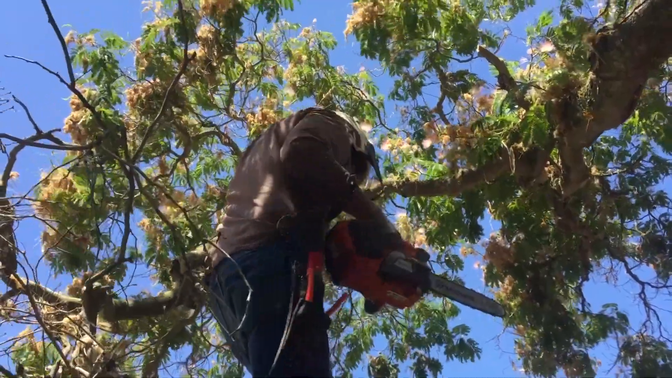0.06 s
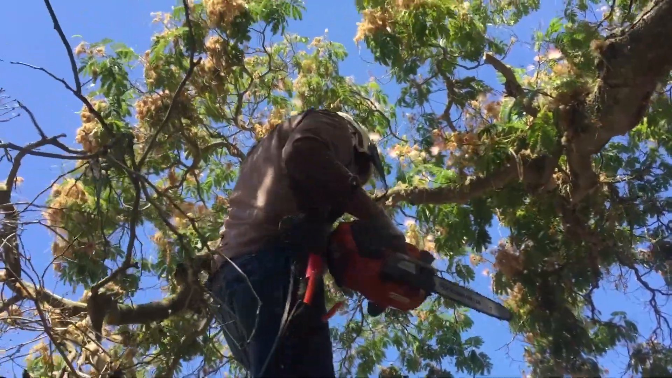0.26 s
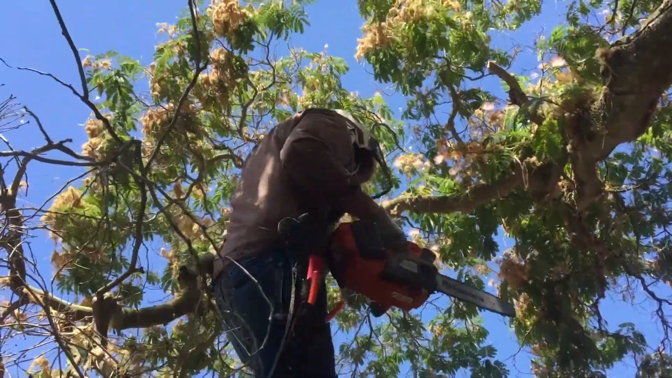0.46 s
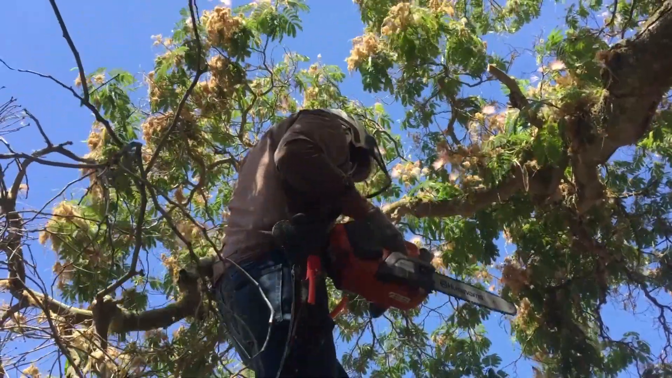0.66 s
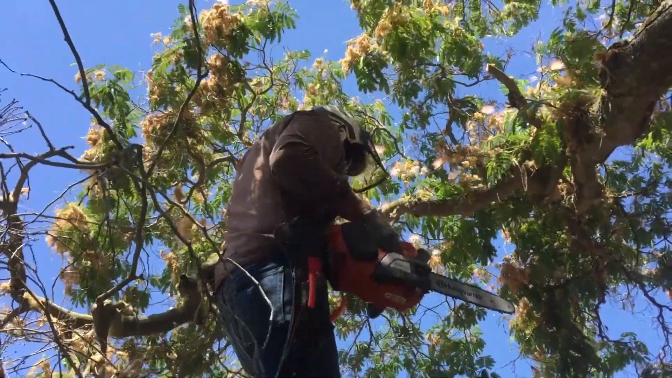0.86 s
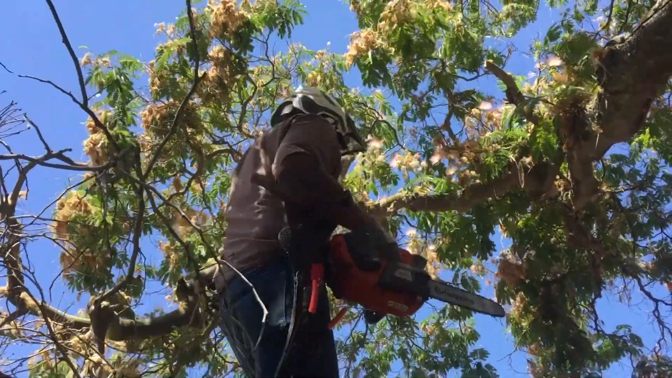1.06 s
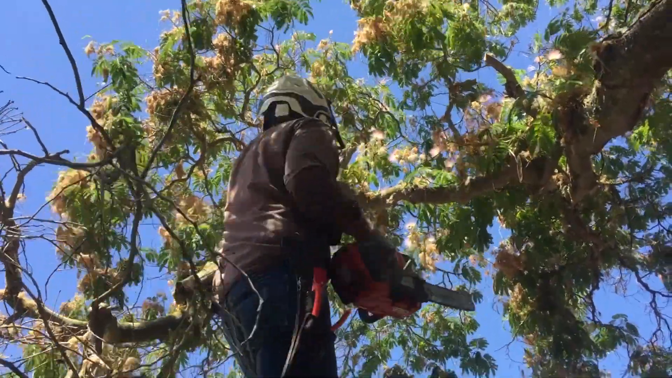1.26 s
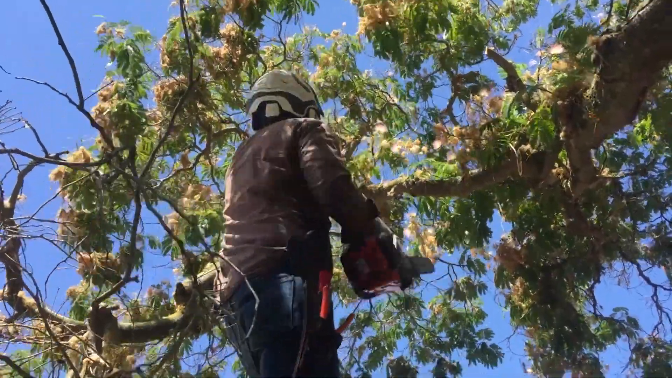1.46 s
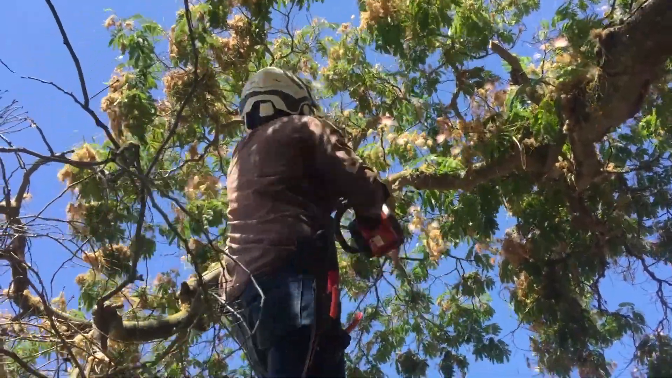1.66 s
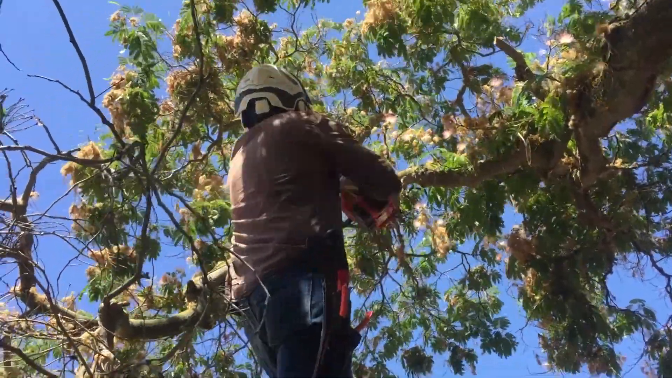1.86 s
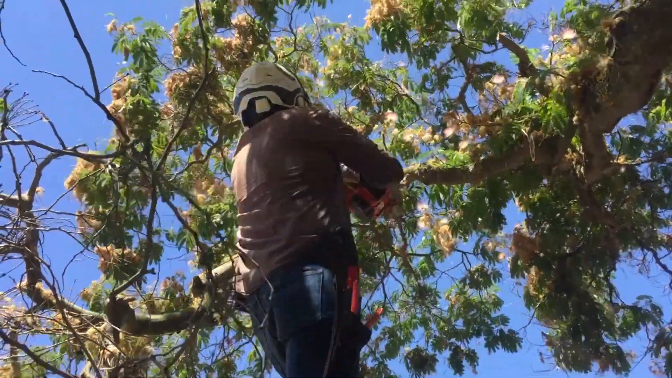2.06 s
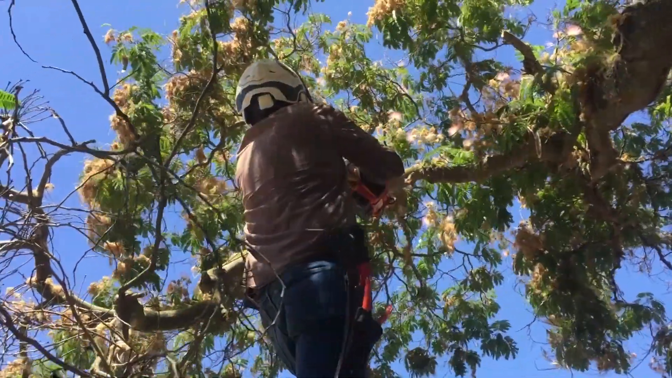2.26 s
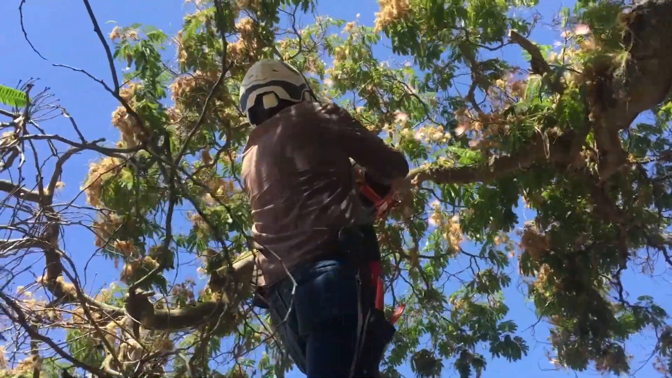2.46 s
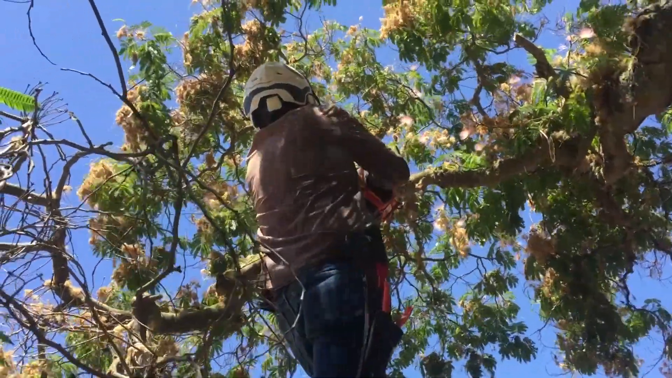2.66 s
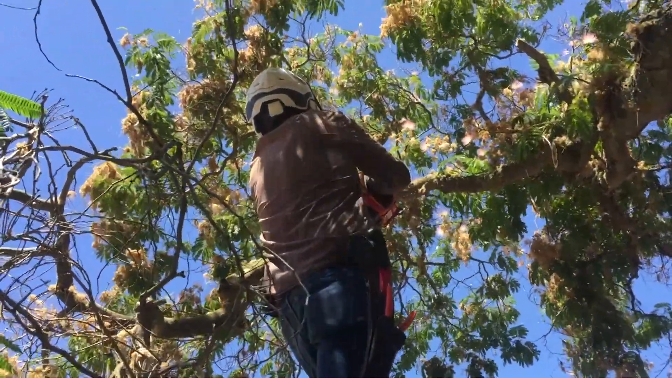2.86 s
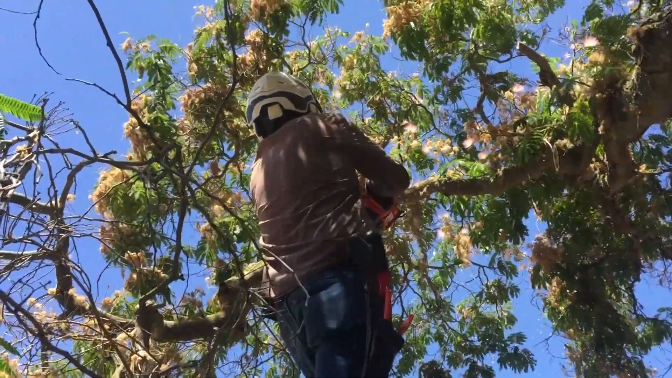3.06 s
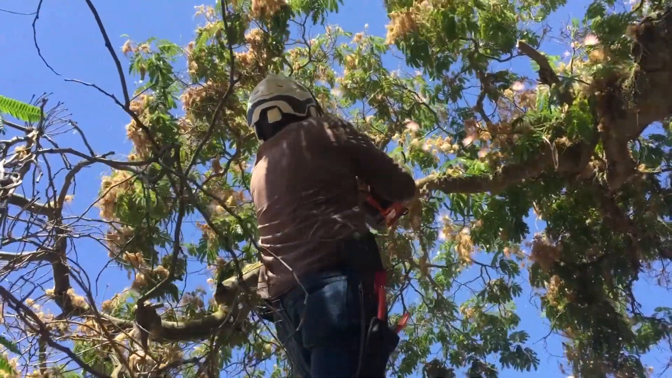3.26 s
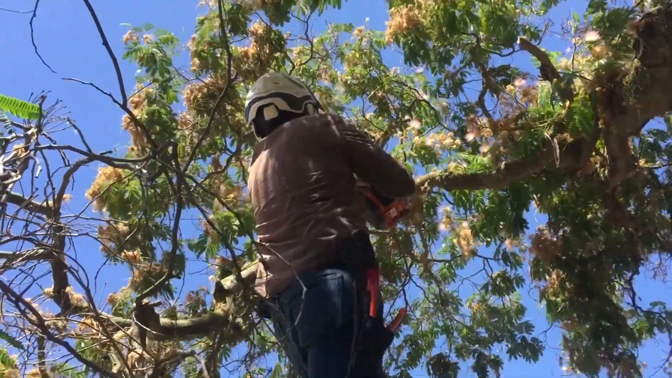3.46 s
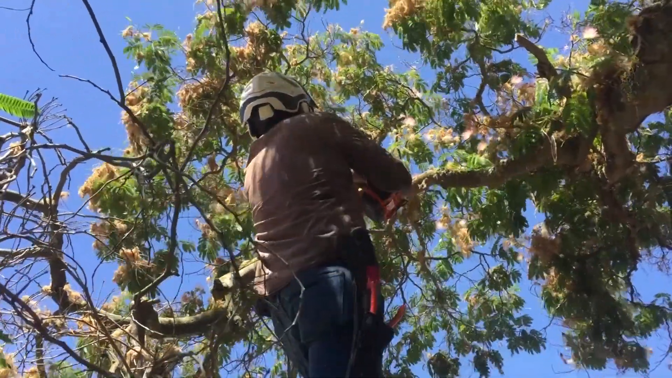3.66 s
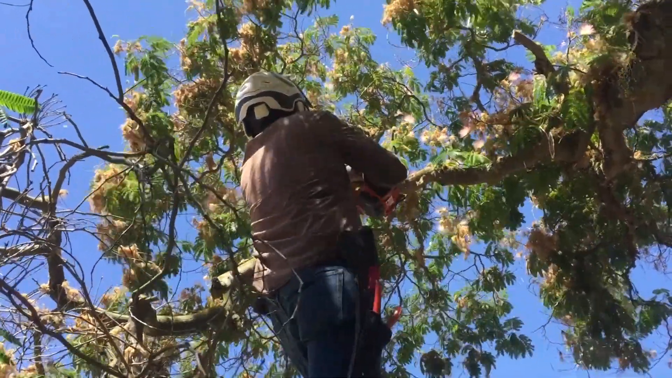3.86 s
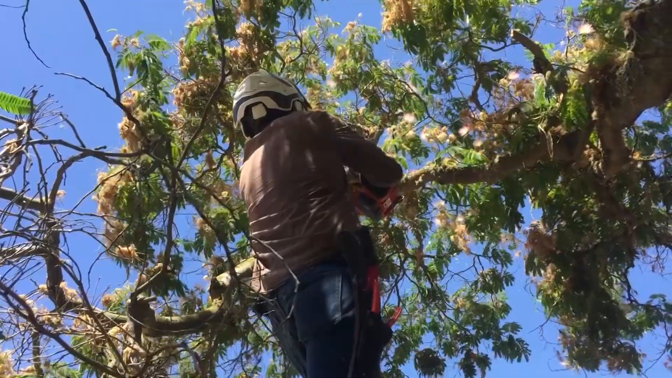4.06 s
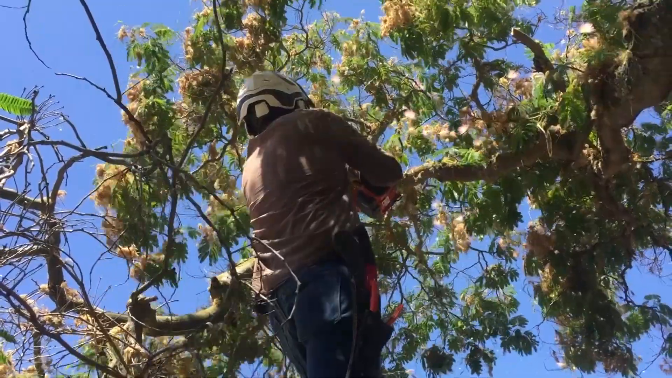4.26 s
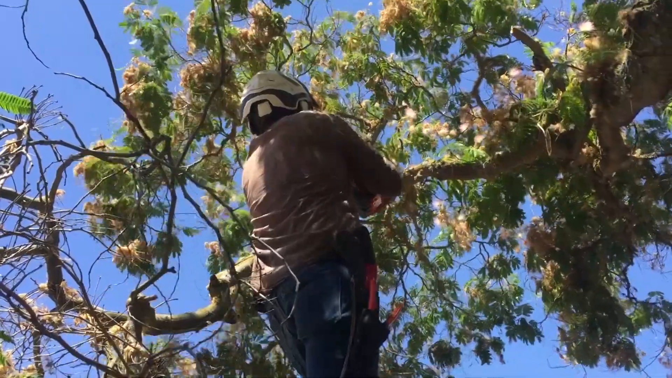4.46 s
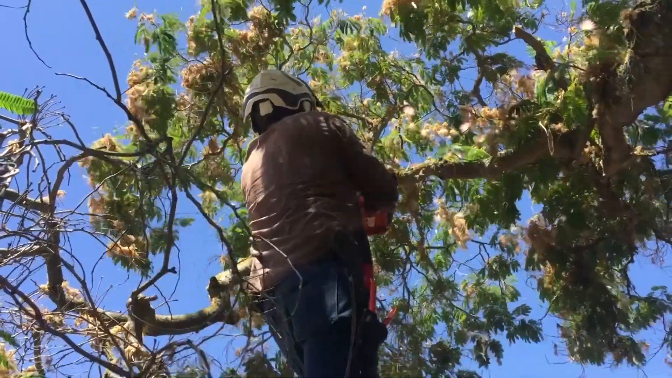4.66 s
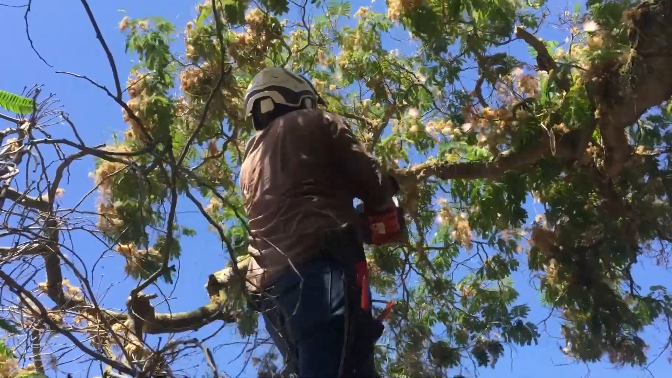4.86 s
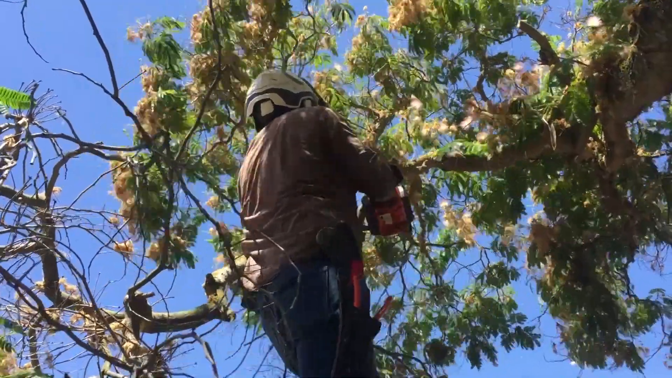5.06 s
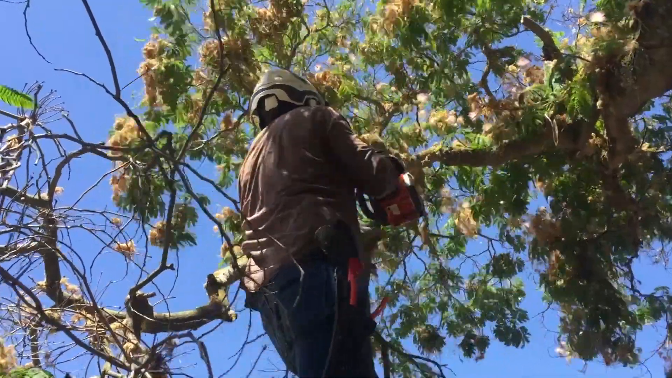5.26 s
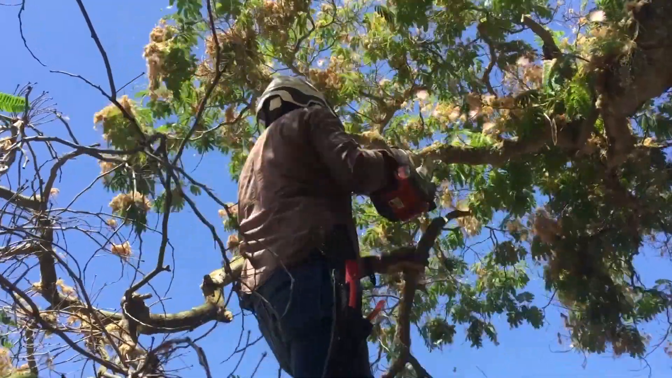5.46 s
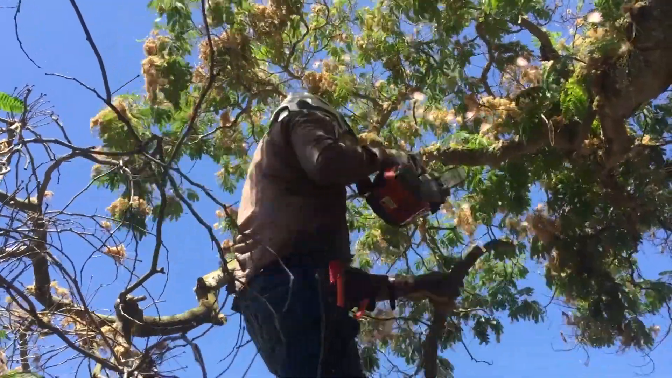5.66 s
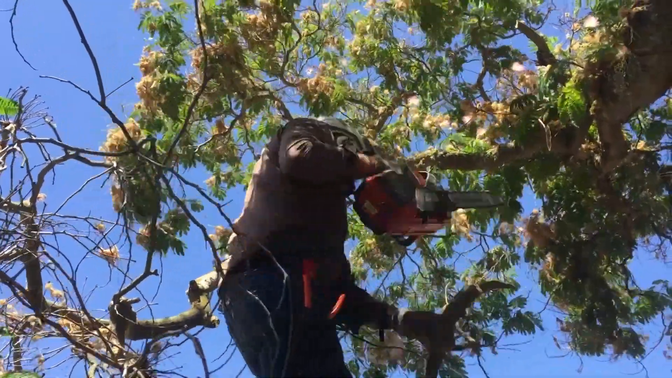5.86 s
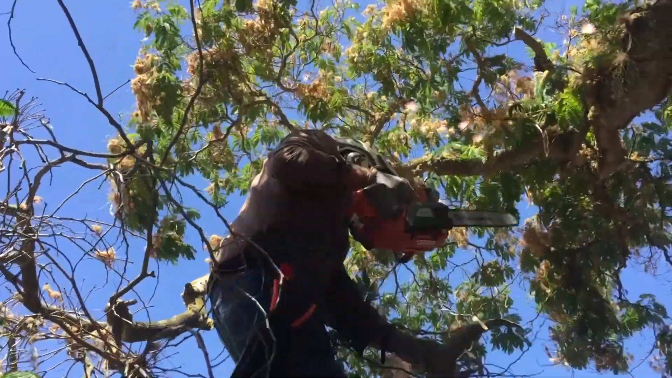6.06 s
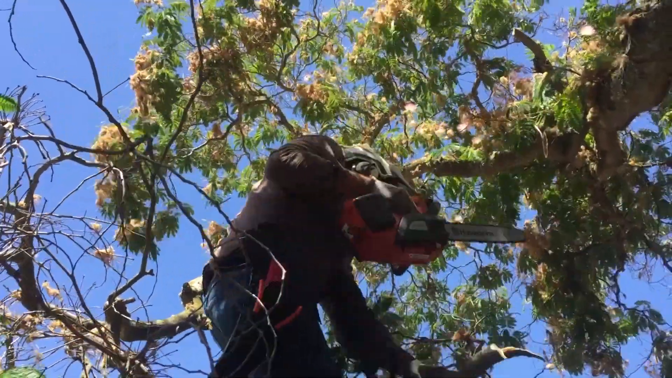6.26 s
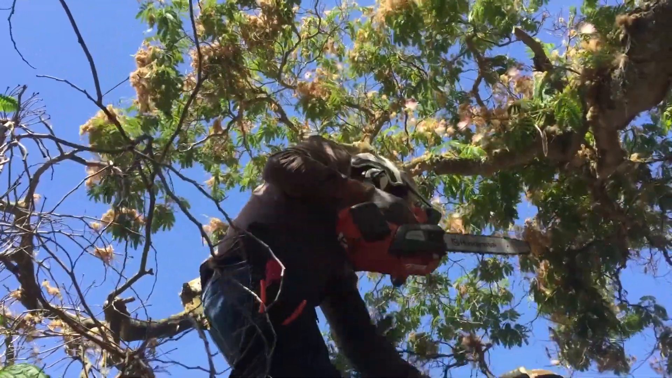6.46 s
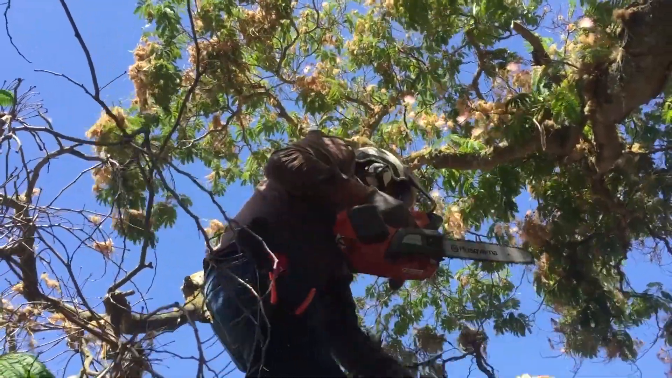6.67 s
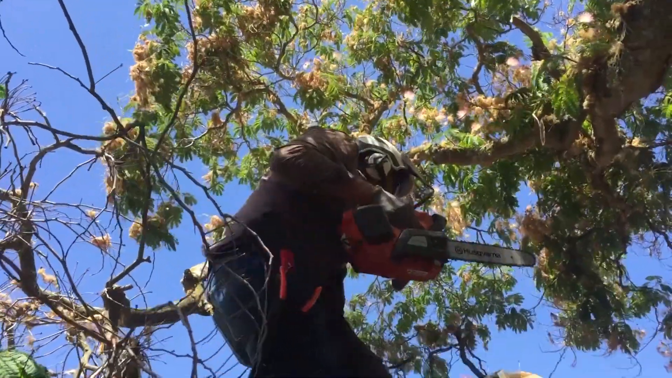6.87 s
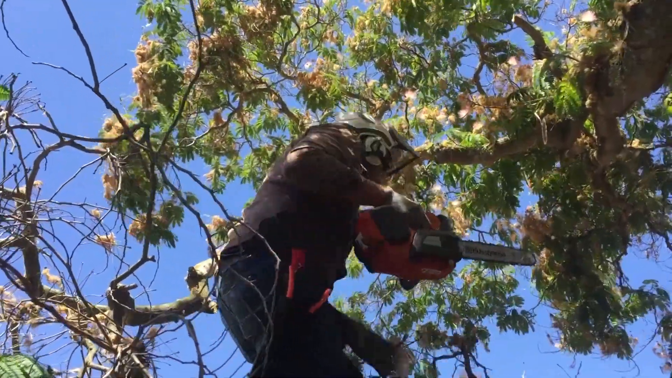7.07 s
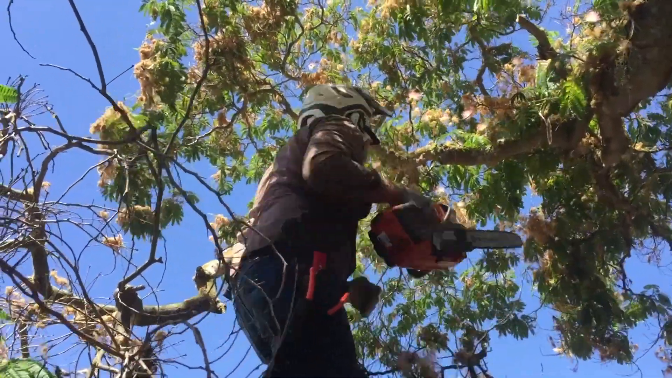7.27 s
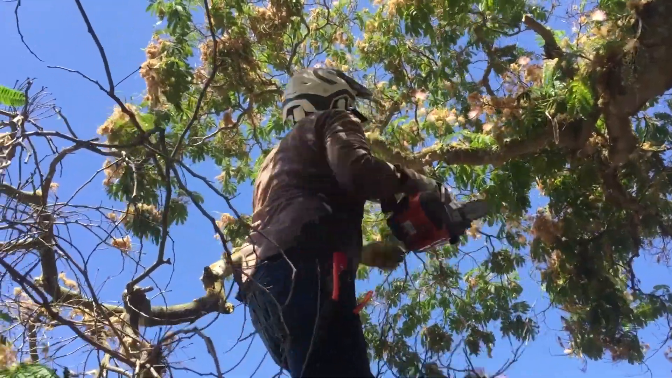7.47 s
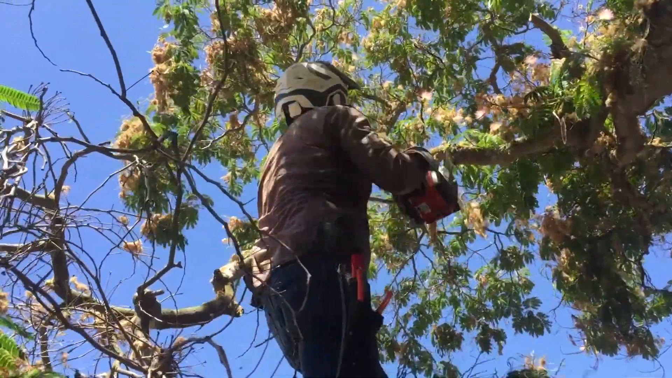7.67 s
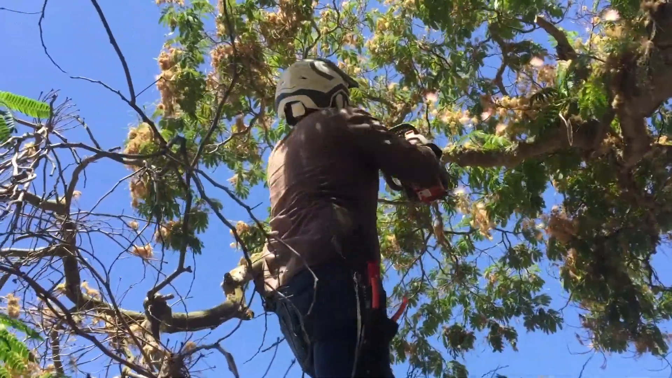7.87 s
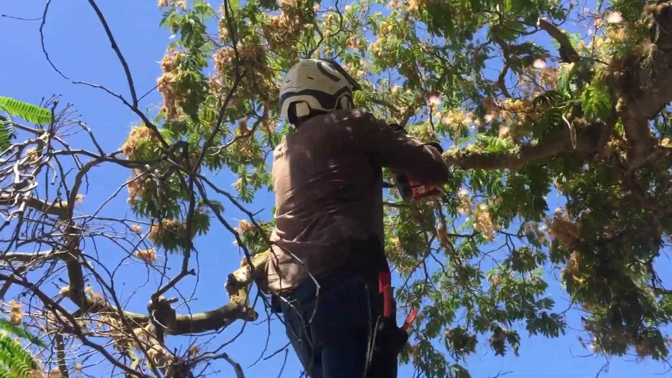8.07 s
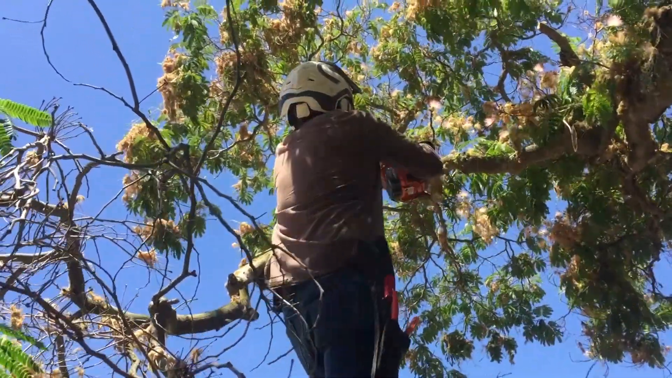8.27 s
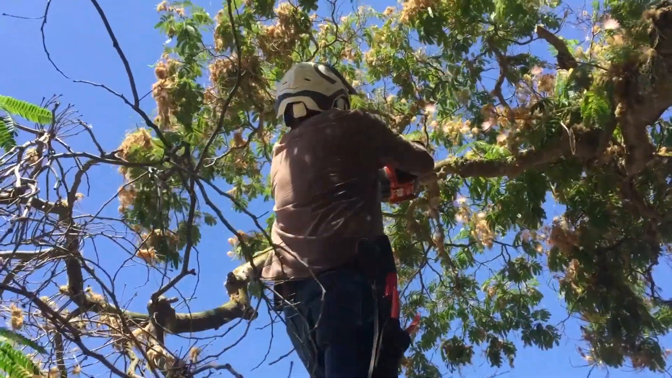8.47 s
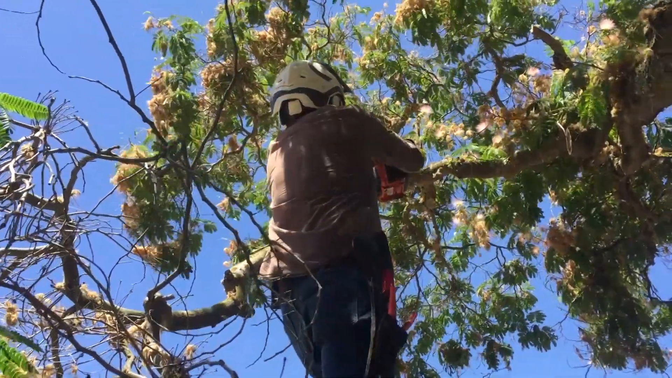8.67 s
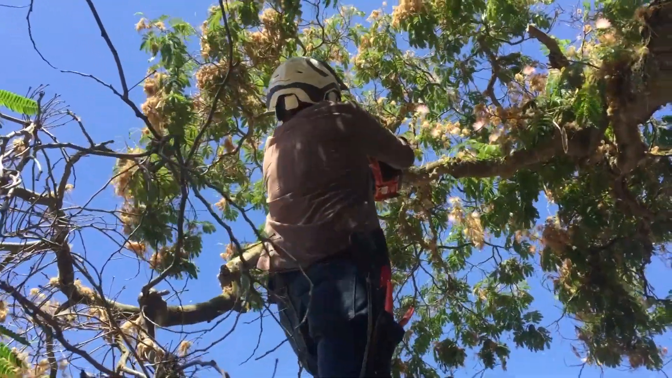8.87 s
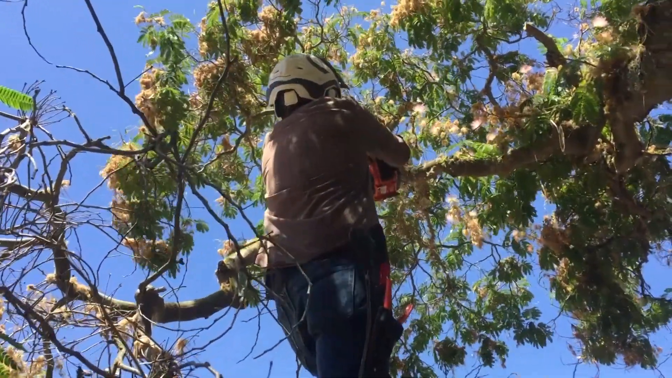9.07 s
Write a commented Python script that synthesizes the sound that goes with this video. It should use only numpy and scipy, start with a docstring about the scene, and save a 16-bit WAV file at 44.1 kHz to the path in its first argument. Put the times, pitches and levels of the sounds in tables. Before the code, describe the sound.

Heard from the ground outdoors, a climber prunes a tree with a small battery chainsaw. A sharp snap and faint falling bird whistles come first, then two quick bursts of rising electric whine and chain chatter. A limb knocks, leaves rustle, and a run of twig snaps and gear clicks follows. The saw starts again at the end. A far engine hums softly throughout.

```python
"""Under a tree: a climber prunes it with a small battery chainsaw, heard from the ground.
The motor spins up in three bursts: links slap the sprocket (harmonic whine) and chatter in the bar (shaped
grains and noise). Decaying noise makes snaps, knocks and jolts; flicked resonators make twigs and leaves.
A metal part squeaks and a small bird whistles falling notes (sines); a far engine hums and rumbles in open air."""
import sys
import numpy as np
from scipy import signal
from scipy.fft import rfft, irfft, next_fast_len
from scipy.io import wavfile
from scipy.ndimage import uniform_filter1d

SR = 44100
rng = np.random.default_rng(int(sys.argv[2]) if len(sys.argv) > 2 else 0)


def unload_wav(signal):
    """Save mono or channel-first audio to the path in sys.argv[1] as 16-bit WAV at rate SR, clipped to [-1, 1]."""
    wavfile.write(
        sys.argv[1],
        SR,
        np.round(np.clip(np.atleast_2d(signal).T, -1, 1) * 32767).astype(np.int16),
    )


N = 402191
TIME = np.arange(N) / SR
LINKS_PER_TURN, TOP_SPEED_TURNS_PER_S = 6, 170
# resonances of bar and housing: centre_hz, width_hz, boost_db
BAR_RESONANCES = [(845, 115, 9), (1181, 120, 6.5), (1460, 51, 9), (1837, 11, 14.5), (2714, 35, 4.5),
                  (5220, 58, 7), (5860, 75, 2.5), (6230, 53, 5)]
# trigger pulls: start_s, shade_db (how the saw is held, acts on whine harmonics 3 and up)
TRIGGER_PULLS = [(2.465, 0.5), (3.714, 0.5), (8.622, -0.5)]


def chainsaw():
    """Links meet the sprocket six times a turn and clatter in the bar's groove, louder with speed and tension."""
    # chain tension, slack when coasting, tight in the cut: time_s, tension_db
    tension = [(2.6, 2), (2.8, 0.5), (2.95, -1.5), (3.25, -1.9), (3.34, -0.7), (3.45, -1.5), (3.85, -0.5),
               (3.98, 1.3), (4.1, 0.9), (4.24, 0.2), (4.38, -1), (4.54, 3), (8.78, 3), (8.9, 0.4),
               (9.12, -1.8)]
    # rattle spectrum: freq_hz, relative_db
    rattle_colour = [(150, -57.5), (330, -8.5), (520, -5.5), (700, 0.5), (1100, -2.5), (2200, 1.5),
                     (4600, -3.5), (6000, -37.5), (9000, -39)]
    # hiss spectrum: freq_hz, relative_db
    hiss_colour = [(3000, -8), (4800, -6.5), (6000, -5), (7200, -9), (8600, -4.5), (9700, -7), (10500, -12),
                   (12200, -5.5), (16000, -16)]
    # at top speed and 0 dB tension
    rattle_db, hiss_db, ripple_db = -28.5, -24.5, -46.5
    # exponents of speed; shares of tension
    rattle_power, hiss_power, rattle_taut, hiss_taut = 0.92, 1.49, 0.81, 1

    speed = motor_speed()
    (tension_db,) = in_time(tension)
    pace = speed / TOP_SPEED_TURNS_PER_S
    slack = np.clip(1 - speed / 120, 0, 1)   # a slow chain hangs loose and runs unevenly
    unevenness = (0.00092 + 0.05 * slack) * drift(40.6)
    turns = np.cumsum(speed * (1 + unevenness)) / SR
    link_phase = 2 * np.pi * LINKS_PER_TURN * turns

    # impacts bunch once a link and swell once a turn
    per_link = 1 + 0.16 * np.cos(link_phase)
    per_turn = 1 + 0.027 * np.cos(2 * np.pi * turns)
    beat = per_link * per_turn * from_db(0.59 * drift(35))
    rattle_level = from_db(rattle_db + rattle_taut * tension_db) * pace ** rattle_power
    hiss_level = from_db(hiss_db + hiss_taut * tension_db) * pace ** hiss_power
    rattle = rattle_level * coloured(beat * grains(14000, spread_db=2.0), rattle_colour, BAR_RESONANCES)
    hiss = hiss_level * coloured(beat * rng.standard_normal(N), hiss_colour, BAR_RESONANCES)
    motor = from_db(ripple_db) * pace ** 2 * ripple(turns)
    return whine(link_phase, speed, tension_db) + motor + rattle + hiss


def motor_speed():
    """At each pull the motor climbs its soft start until it meets the speed it is allowed."""
    # soft start, alike at every pull: after_pull_s, speed_turns_per_s
    spin_up = [(0, 0.5), (.065, 29.5), (.135, 52), (.235, 79), (.335, 122.5), (.43, 172)]
    # speed that trigger and wood allow, one list per pull: time_s, speed_turns_per_s
    held_speed = [
        [(2.89, 170), (3.13, 170.5), (3.31, 162.5), (3.35, 150.5), (3.43, 123.5), (3.55, 89), (3.7, 60.5),
         (4.0, 0)],
        [(4.125, 161.5), (4.3, 151.5), (4.35, 144.5), (4.45, 124.5), (4.5, 124), (4.55, 109), (4.645, 0)],
        [(9.04, 163.6), (9.12, 170)],
    ]
    after_s, climb = np.transpose(spin_up)
    runs = []
    for (start_s, _), held in zip(TRIGGER_PULLS, held_speed):
        soft_start = np.interp(TIME - start_s, after_s, climb, left=0)
        runs.append(np.minimum(soft_start, in_time(held)[0]))
    return np.maximum(np.max(runs, axis=0), 0)


def whine(link_phase, speed, tension_db, flicker_db=2.5):
    """Link-rate harmonics flare as they sweep through the saw's resonances; a taut chain sings brighter."""
    # harmonics from the link rate up: level_db (top speed, before colour), gain_per_tension_db
    link_harmonics = [(-29.5, -0.8), (-34.5, 2.5), (-39.5, 0.3), (-37.5, 1.5), (-42.5, 2.5), (-42, 1.6)]
    # how the saw radiates the whine: freq_hz, gain_db
    whine_colour = [(200, -29), (470, -6), (555, -7.5), (610, 3.5), (705, 0.5), (765, -7), (850, -3.5),
                    (930, -0.5), (1030, -8), (1250, -8), (1500, -2), (1660, -6), (1800, 0), (2050, 2),
                    (2300, 1), (3000, 0.5), (3880, 0), (4070, -5), (4500, 3), (5400, -17), (6100, 6.5)]
    hz = np.arange(1, SR / 2)
    radiated_db = shape_db(hz, whine_colour, BAR_RESONANCES)
    pulled_s, shade_db = np.transpose(TRIGGER_PULLS)
    shade_db = shade_db[np.searchsorted(pulled_s, TIME) - 1]
    out = 0
    for k, (db, taut) in enumerate(link_harmonics, 1):
        colour_db = np.interp(k * LINKS_PER_TURN * speed, hz, radiated_db)
        level_db = db + taut * tension_db + (k > 2) * shade_db + colour_db
        waver_rad = 0.14 * k * drift(45)
        out = out + from_db(level_db + flicker_db * drift(12)) * np.sin(k * link_phase + waver_rad)
    return np.sqrt(2) * speed / TOP_SPEED_TURNS_PER_S * out


def ripple(turns):
    """Weak motor lines; the chain whips about, so each one wavers."""
    # motor lines: multiple of the turning rate
    motor_orders = [5, 7, 8, 9, 11, 14, 16, 22]
    lines = 0
    for multiple in motor_orders:
        level = from_db(1.8 * drift(2.7))
        phase = 2 * np.pi * (multiple * turns + rng.random()) + 0.19 * drift(13)
        lines = lines + level * np.sin(phase)
    return coloured(lines, [(450, 0), (12000, 0.024)], BAR_RESONANCES)


def jerks():
    """The starting chain or a bump jolts the housing: a short clash and a hollow clunk."""
    # jolts: start_s, relative_db
    jolts = [(2.4631, -39), (2.4702, -25.5), (2.483, -31), (2.501, -37), (6.413, -39.5), (7.222, -39),
             (8.628, -44), (8.635, -32.5), (8.656, -33)]
    # housing modes: centre_hz, width_hz, relative_db
    housing_modes = [(420, 39, 10), (670, 56, 5.5), (792, 320, -3), (2250, 730, -7), (3330, 1700, -14.5)]
    start_s, db = np.transpose(jolts)
    clash = bursts(start_s, db, 0.034) * rng.standard_normal(N)
    return from_db(17.5) * ring(clash, housing_modes) + from_db(-5) * band(clash, 512, 9000)


def snaps():
    """Twigs snap and gear clicks: fibres part in milliseconds, splinters crackle on briefly."""
    # snaps: start_s, crack_relative_db, treble_relative_db, duration (t60_s / 1.87)
    snap_events = [(0.3765, -48, -53, 0.009), (.6536, -54, -48, 0.078), (0.8258, -56, -50.5, 0.018),
                   (0.982, -31.5, -20, 0.0084), (1.0488, -52.5, -51.5, 0.041), (4.738, -58, -52, .015),
                   (4.8437, -69, -47, 0.013), (5.1137, -44.5, -42, 0.017), (5.8431, -48, -45, 0.0067),
                   (6.187, -52, -39.5, 0.013), (6.364, -64.5, -49.5, 0.027), (6.5247, -38, -30.5, 0.014),
                   (6.602, -33, -29.5, 0.0046), (6.6808, -42, -38, 0.0073), (6.736, -42.5, -44, 0.0073),
                   (6.782, -50, -45.5, 0.025), (6.914, -60, -49.5, 0.017), (7.213, -37.5, -29, 0.014),
                   (7.2435, -50, -36.5, 0.006), (7.3539, -50.5, -49.5, 0.029), (7.4801, -51, -40, 0.01),
                   (7.4951, -37.5, -29, 0.016), (7.538, -41, -33, 0.01), (7.669, -31, -27, 0.0086),
                   (7.796, -43, -51, .03), (7.807, -40, -28.5, 0.0069)]
    start_s, crack_db, treble_db, duration = np.transpose(snap_events)
    t60_s = 1.87 * duration
    onset_db = 10 * np.log10(1 + 0.23 / t60_s)   # a shorter snap packs its energy into a higher peak
    crack = splinters(1390, 5000) + from_db(-10) * noise(330, 1300)
    out = 0
    for db, source in [(crack_db, crack), (treble_db, splinters(5160, 16000))]:
        envelope = bursts(start_s, db + onset_db, t60_s) + bursts(start_s, db - 17.0, 0.08)
        out = out + source * uniform_filter1d(envelope, size=24)   # the break opens in about 0.5 ms
    return out


def splinters(low_hz, high_hz, count=5):
    """Noise whose bands swell independently, so that snaps differ in colour."""
    edges_hz = np.geomspace(low_hz, high_hz, count + 1)
    parts = []
    for low, high in zip(edges_hz, edges_hz[1:]):
        parts.append(rms_one(band(rng.standard_normal(N), low, high)))
    parts = np.array(parts)
    swell_db = 2 * np.array([drift(12) for _ in parts])
    gains = from_db(swell_db) * edges_hz[1:, None] ** 0.25
    return rms_one(np.sum(parts * gains, axis=0) / np.linalg.norm(gains, axis=0))


def knocks():
    """Limbs bump: bark crunches into the wood's modes, over a low thump."""
    # knocks: start_s, knock_relative_db, thump_relative_db
    knock_events = [(0.453, -46, -48), (0.984, -36.5, -37.5), (4.812, -62.5, -40.5), (5.029, -39.5, -67),
                    (5.05, -41, -63), (5.4861, -22.5, -61), (5.509, -34, -39), (5.667, -50.5, -60),
                    (6.792, -44, -64), (7.215, -32.5, -59), (7.836, -37.5, -42.5)]
    # limb modes: centre_hz, width_hz, relative_db
    limb_modes = [(207.4, 14, 6.5), (404, 60, -9), (756, 130, -4), (1124, 116, -1), (1800, 240, -3.5),
                  (3420, 900, -8.5), (6450, 1200, -8.5)]
    start_s, db, thump_db = np.transpose(knock_events)
    crunch = bursts(start_s, db, 0.052) * rng.standard_normal(N)
    shudder = bursts(start_s, db - 6.5, 0.2) * band(rng.standard_normal(N), 150, 1500)   # low modes ring on
    thump = bursts(start_s, thump_db + 0.5, 0.28) * noise(38, 210)
    return from_db(17) * ring(crunch + shudder, limb_modes) + thump


def squeak(t60_s=0.4):
    """A metal part of the gear sings faintly in thin, unsteady tones."""
    # tones: freq_hz, relative_db
    squeak_tones = [(2476, -7), (2713, -1.5)]
    start_s, length_s, level_db = 0.41, 0.14, -64
    tones = 0
    for hz, db in squeak_tones:
        tones = tones + from_db(db + 2 * drift(20)) * np.sin(2 * np.pi * hz * TIME)
    return swells([start_s], [length_s], [level_db], t60_s) * tones


def foliage():
    """The climber brushes by: twigs scrape and dry leaves rub, with stray ticks."""
    # brushes: start_s, length_s, twig_db, leaf_db
    brushes = [(0.447, 0.068, -53.5, -56), (0.672, 0.017, -54.5, -51), (4.601, 0.041, -43.5, -45),
               (4.736, 0.48, -57.5, -57), (5.108, 0.029, -56, -39), (5.29, 0.022, -64.5, -49),
               (6.027, 0.05, -63.5, -50), (6.39, 0.054, -62, -52.5), (6.521, 0.17, -66, -51),
               (6.865, .03, -66, -47.5), (7.144, 0.12, -56, -52.5), (7.48, 0.41, -51, -49),
               (7.81, 0.027, -48, -44)]
    # leaves stirring between brushes: time_s, level_db
    stir_level = [(0, -71.5), (1.1, -73), (1.4, -86.5), (4.3, -85), (4.7, -53.5), (5.9, -63.5),
                  (7.9, -54.5), (8.1, -68.5), (8.6, -76)]
    # twig spectrum: freq_hz, relative_db
    twig_colour = [(200, -13.5), (400, 3), (900, 0.5), (1600, -2.5), (2800, -3), (5000, -7.5)]
    # leaf spectrum: freq_hz, relative_db
    leaf_colour = [(1500, -28.5), (3200, -5), (6000, -4), (9000, -2.5), (10500, -6), (12500, -3),
                   (16000, -7)]
    twig_t60_s, leaf_t60_s, stir_twig_db = 0.37, 0.33, -8   # stir_twig_db: twigs against leaves
    start_s, length_s, twig_db, leaf_db = np.transpose(brushes)
    stir = from_db(in_time(stir_level)[0])
    twigs = np.hypot(swells(start_s, length_s, twig_db, twig_t60_s), from_db(stir_twig_db) * stir)
    leaves = np.hypot(swells(start_s, length_s, leaf_db, leaf_t60_s), stir)
    scrape = coloured(crackle(3000, spread_db=3.0), twig_colour)
    rustle = rms_one(crackle(7000, spread_db=2.8))
    ticks = from_db(-5) * grains(70, spread_db=3.5)
    return twigs * scrape + leaves * coloured(rustle + ticks, leaf_colour)


def crackle(per_s, spread_db, clump_db=4, count=30):
    """Each flick of a twig or leaf rings briefly at one of many pitches."""
    flicks = grains(per_s, spread_db) * from_db(clump_db * drift(16))
    dealt = rng.integers(0, count, N)
    pitches_hz = np.geomspace(380, 15500, count)
    widths_hz = 60 + pitches_hz / 22
    return sum(ring(flicks * (dealt == k), [(pitches_hz[k], widths_hz[k], 0)]) for k in range(count))


def bird(high_hz=6800, low_hz=5150, length_s=0.047):
    """A small bird's thin whistles slide down."""
    # notes: start_s, peak_db
    bird_notes = [(.76, -60), (.855, -64), (.94, -62.5), (1.13, -70)]
    out = np.zeros(N)
    along = np.linspace(0, 1, int(length_s * SR))
    pitch_hz = high_hz + (low_hz - high_hz) * along
    note = np.sin(np.pi * along) * np.sin(2 * np.pi * np.cumsum(pitch_hz) / SR)
    for start_s, db in bird_notes:
        at = int(start_s * SR)
        out[at:at + len(note)] += from_db(db) * note
    return out


def surroundings():
    """A far engine hums at firing-rate multiples and throbs as noise, under the hush of open air."""
    # engine lines: multiple of the firing rate, mean_peak_db
    engine_lines = [(2, -57), (3, -60), (4, -62.5)]
    # rumble spectrum: freq_hz, relative_db
    rumble_colour = [(20, -44), (35, -27.5), (50, 1), (90, -2), (150, -4.5), (260, -7), (320, -18),
                     (400, -34.5)]
    # rumble course: time_s, relative_db
    rumble_level = [(0, -60.5), (1.2, -60), (4.4, -55.5), (4.9, -54), (5.3, -57.5), (6.2, -58.5),
                    (7.75, -53), (8.1, -57.5)]
    # open-air spectrum: freq_hz, relative_db
    air_colour = [(100, -5.5), (700, 0.5), (1300, -5), (2500, -11), (5000, -15), (16000, -25.5)]
    firing_hz = 33.9
    firing_phase = 2 * np.pi * np.cumsum(firing_hz * (1 + 0.012 * drift(2.4))) / SR
    hum = 0
    for k, db in engine_lines:
        level = from_db(db + 1.6 * drift(2.1))
        hum = hum + level * np.sin(k * firing_phase + 2 * np.pi * rng.random())
    throb = (1 + 0.4 * np.cos(firing_phase)) * from_db(1.2 * drift(24))
    level = from_db(in_time(rumble_level)[0] + 3.5)
    rumble = level * coloured(throb * rng.standard_normal(N), rumble_colour)
    air = from_db(-68.5) * coloured(rng.standard_normal(N), air_colour)
    return hum + rumble + air


def canopy(x, scatter_db=-17, t60_s=0.18, treble_db=-22):
    """Early echoes from trunks and ground, then a short wash scattered by leaves and branches."""
    # echoes: delay_s, level_db
    early_echoes = [(.0031, -18), (.0074, -23.5), (0.014, -20)]
    age_s = TIME[:SR // 2]
    response = np.zeros(len(age_s))
    for low_hz, high_hz, db, decay_s in [(120, 4000, scatter_db, t60_s), (4000, 14000, treble_db, 0.75 * t60_s)]:
        decay = np.exp(-np.log(1000) * age_s / decay_s)
        wash = band(rng.standard_normal(len(age_s)), low_hz, high_hz) * decay * (age_s > 0.004)
        response += from_db(db) * wash / np.linalg.norm(wash)
    for delay_s, db in early_echoes:
        response[int(delay_s * SR)] += from_db(db)
    return x + signal.fftconvolve(x, response)[:N]


def from_db(db):
    """Decibels to amplitude."""
    return 10 ** (np.asarray(db) / 20)


def rms_one(x):
    """Scale to rms 1."""
    return x / np.sqrt(np.mean(x ** 2) + 1e-20)


def in_time(rows):
    """Interpolate each column of a table whose first column is time_s."""
    time_s, *columns = np.transpose(rows)
    return [np.interp(TIME, time_s, column) for column in columns]


def drift(rate_hz):
    """Smooth random wander of rms 1, made at SR / 40 and interpolated."""
    r = np.exp(-80 * np.pi * rate_hz / SR)
    slow = signal.lfilter([1], [1, -2 * r, r * r], rng.standard_normal(N // 40 + 2002))[2000:]
    return np.interp(np.arange(N) / 40, np.arange(len(slow)), rms_one(slow))


def shape_db(hz, colour, resonances):
    """Gain in dB of a spectrum with ends falling 24 dB per octave, plus resonances."""
    points_hz, levels_db = np.transpose(colour)
    db = np.interp(np.log(hz), np.log(points_hz), levels_db)
    below_oct = np.maximum(np.log2(points_hz[0] / hz), 0)
    above_oct = np.maximum(np.log2(hz / points_hz[-1]), 0)
    db -= 24 * (below_oct + above_oct)
    for centre_hz, width_hz, boost_db in resonances:
        db += boost_db / (1 + (2 * (hz - centre_hz) / width_hz) ** 2)
    return db


def coloured(x, colour, resonances=()):
    """Shape a signal by a spectrum and resonances; rms 1."""
    size = next_fast_len(N)
    hz = np.maximum(np.fft.rfftfreq(size, 1 / SR), 1)
    gain = from_db(shape_db(hz, colour, resonances))
    return rms_one(irfft(rfft(x, size) * gain, size)[:N])


def band(x, low_hz, high_hz):
    """Butterworth band-pass."""
    edges_hz = [low_hz, min(high_hz, SR / 2 - 1)]
    return signal.sosfilt(signal.butter(2, edges_hz, "band", fs=SR, output="sos"), x + 1e-18)


def noise(low_hz, high_hz):
    """Band of noise at rms 1."""
    return rms_one(band(rng.standard_normal(N), low_hz, high_hz))


def grains(per_s, spread_db):
    """Random tiny impacts of uneven size, rms 1."""
    sizes = from_db(spread_db * np.minimum(rng.exponential(1, N), 5))
    return rms_one((rng.random(N) < per_s / SR) * sizes * rng.choice([-1, 1], N))


def ring(drive, modes):
    """Parallel two-pole resonances, each with its own peak gain and alternating sign."""
    out = 0
    for k, (hz, width_hz, db) in enumerate(modes):
        r = np.exp(-np.pi * width_hz / SR)
        top = (-1) ** k * from_db(db) * (1 - r * r) / 2
        poles = [1, -2 * r * np.cos(2 * np.pi * hz / SR), r * r]
        out = out + signal.lfilter([top, 0, -top], poles, drive + 1e-18)
    return out


def bursts(starts_s, levels_db, t60s_s):
    """Envelope of sudden, dying bursts, summed in power."""
    power = np.zeros(N)
    for start_s, db, t60_s in np.broadcast(starts_s, levels_db, t60s_s):
        at = int(start_s * SR)
        age_s = np.arange(min(int(2 * t60_s * SR), N - at)) / SR
        power[at:at + len(age_s)] += from_db(db - 60 * age_s / t60_s) ** 2
    return np.sqrt(power)


def swells(starts_s, lengths_s, levels_db, t60_s, attack_s=0.016):
    """Envelope of strokes that rise, hold and die away, summed in power."""
    power = np.zeros(N)
    for start_s, length_s, db in zip(starts_s, lengths_s, levels_db):
        first = max(int((start_s - attack_s) * SR), 0)
        span = slice(first, int((start_s + length_s + t60_s) * SR))
        age_s = TIME[span] - start_s
        rise = np.clip(1 + age_s / attack_s, 0, 1)
        fall = from_db(db - 60 * np.maximum(age_s - length_s, 0) / t60_s)
        power[span] += (rise * fall) ** 2
    return np.sqrt(power)


def scene():
    """Saw and surroundings direct, the rest through the canopy; the same signal on both channels."""
    in_tree = jerks() + snaps() + knocks() + squeak() + foliage() + bird()
    mono = chainsaw() + canopy(in_tree) + surroundings()
    return np.array([mono, mono])


def record(dry):
    """The sharpest peaks are rounded and the top is cut steeply."""
    rounded = dry / (1 + (dry / 0.8) ** 4) ** 0.25
    cutoff_hz = 16000
    return signal.sosfilt(signal.ellip(10, 0.1, 70, cutoff_hz, fs=SR, output="sos"), rounded)


dry = scene()
out = record(dry)
unload_wav(out)
```